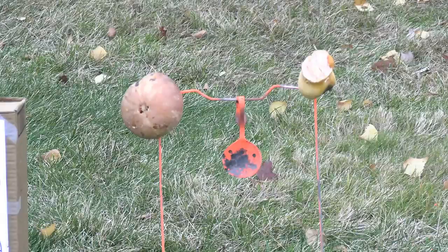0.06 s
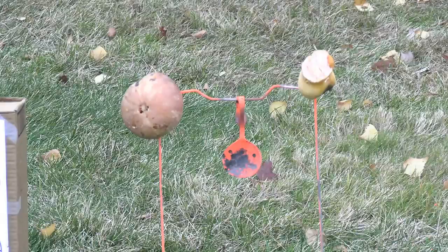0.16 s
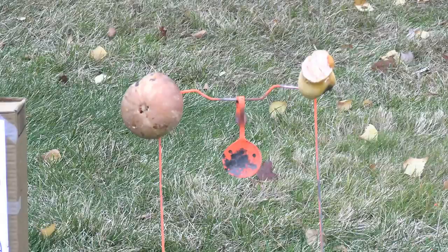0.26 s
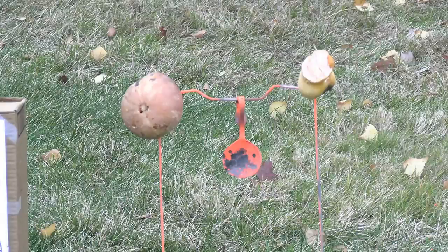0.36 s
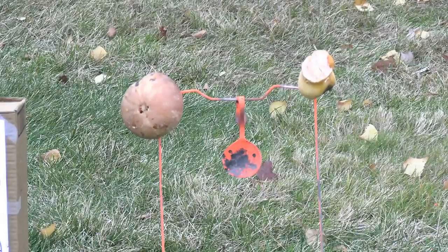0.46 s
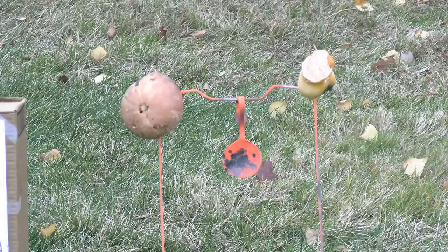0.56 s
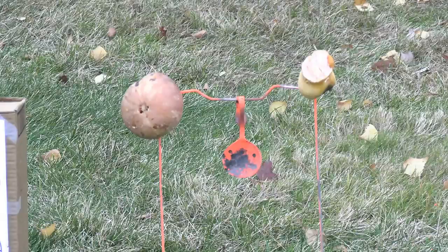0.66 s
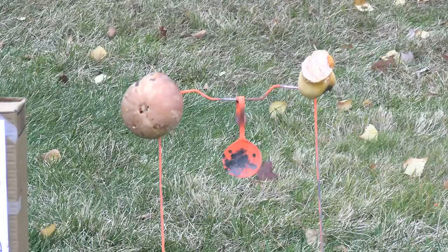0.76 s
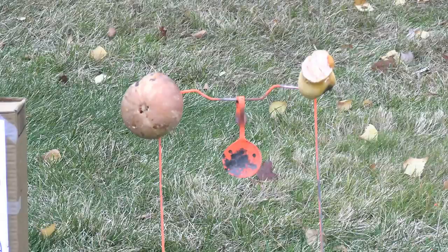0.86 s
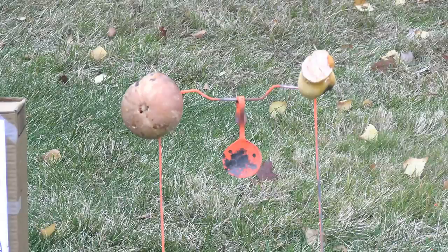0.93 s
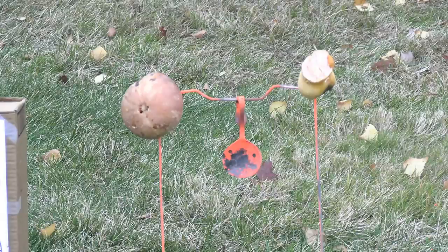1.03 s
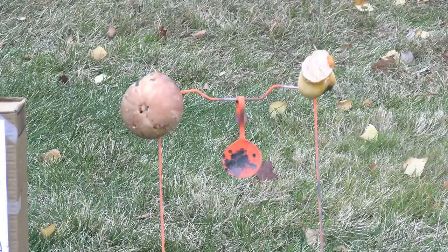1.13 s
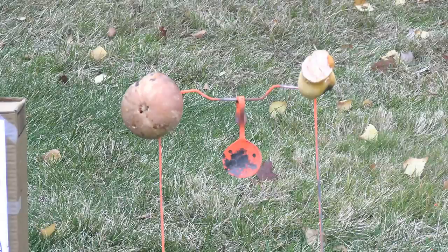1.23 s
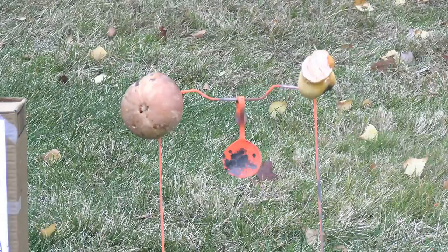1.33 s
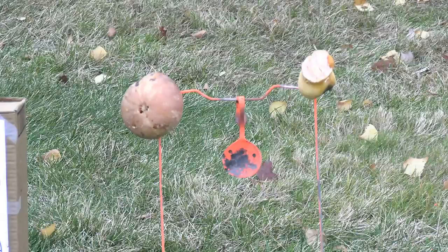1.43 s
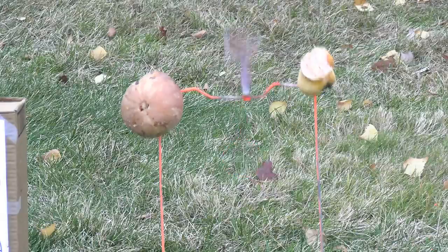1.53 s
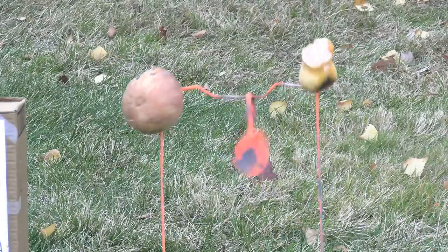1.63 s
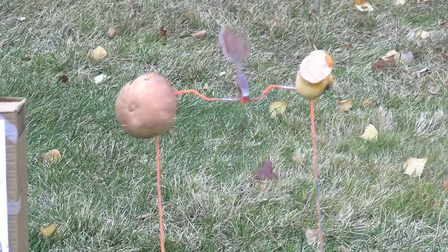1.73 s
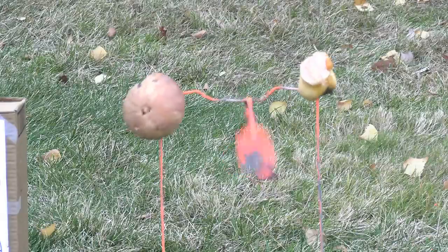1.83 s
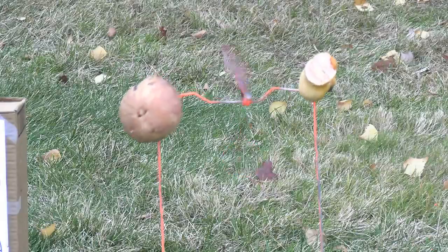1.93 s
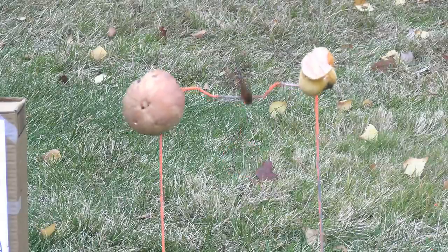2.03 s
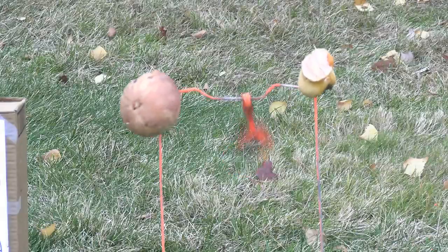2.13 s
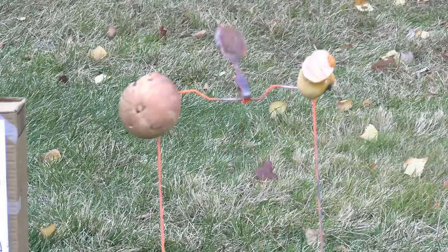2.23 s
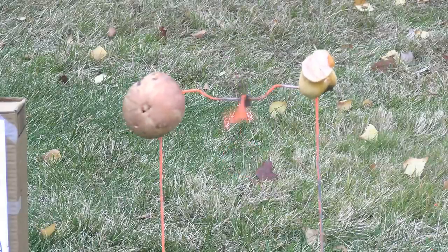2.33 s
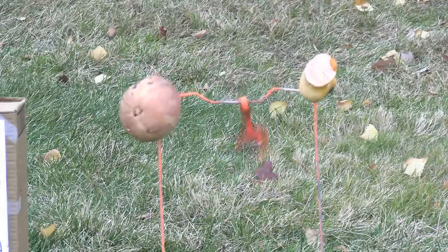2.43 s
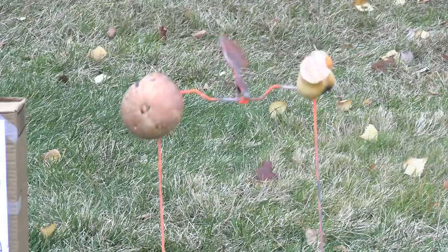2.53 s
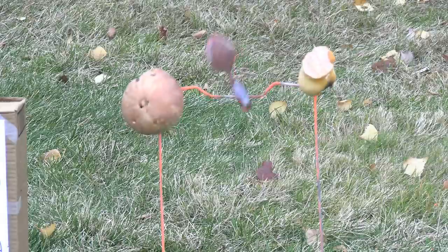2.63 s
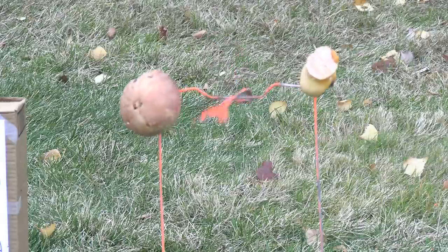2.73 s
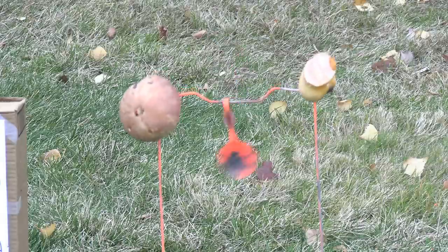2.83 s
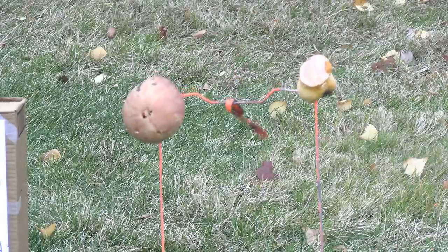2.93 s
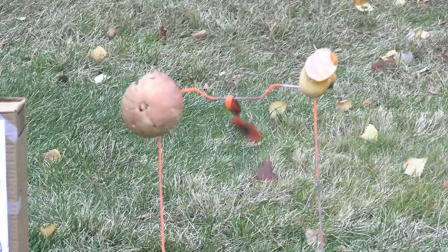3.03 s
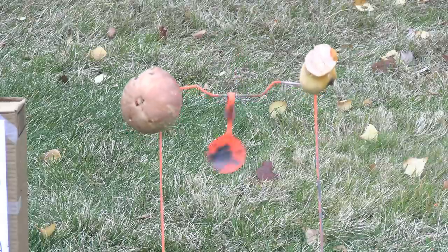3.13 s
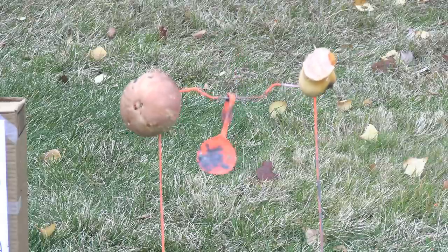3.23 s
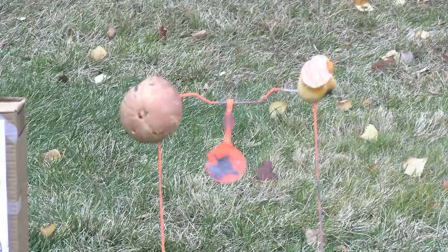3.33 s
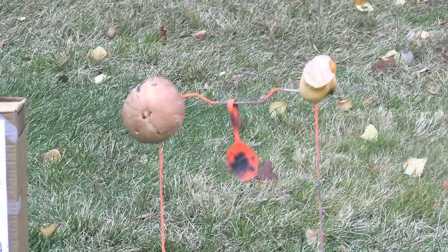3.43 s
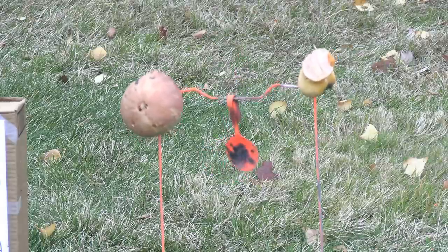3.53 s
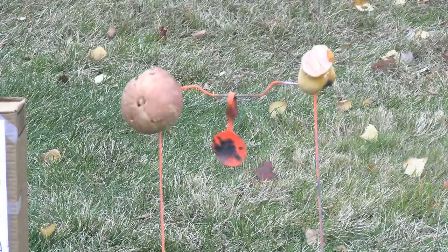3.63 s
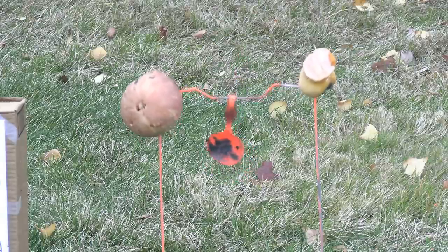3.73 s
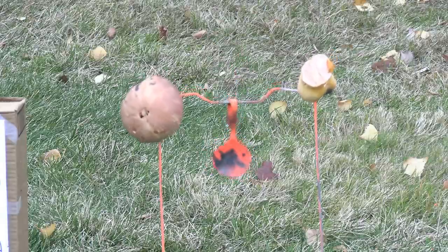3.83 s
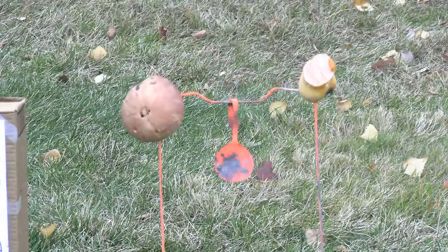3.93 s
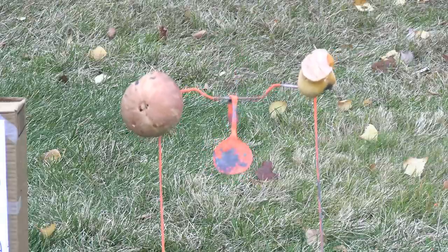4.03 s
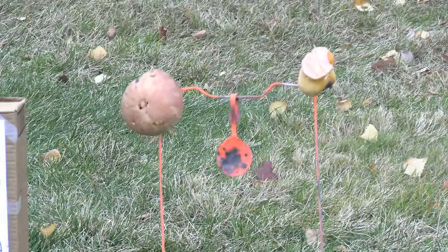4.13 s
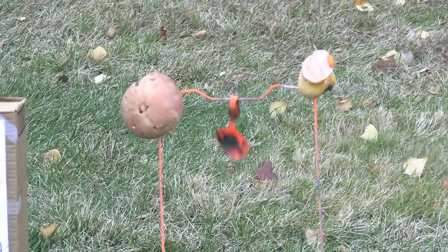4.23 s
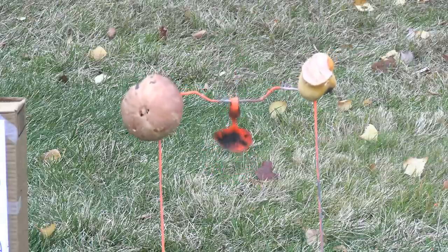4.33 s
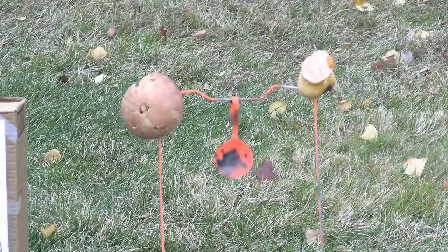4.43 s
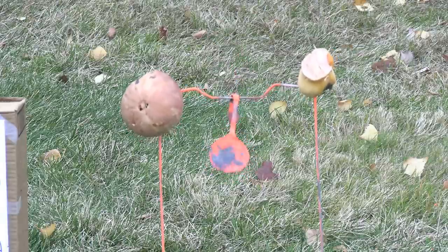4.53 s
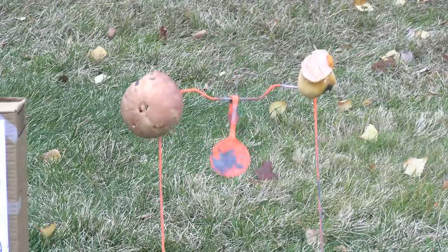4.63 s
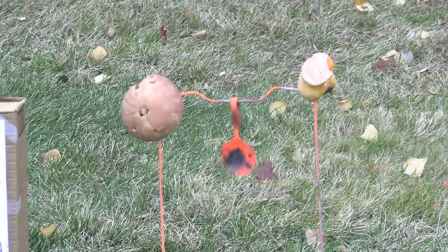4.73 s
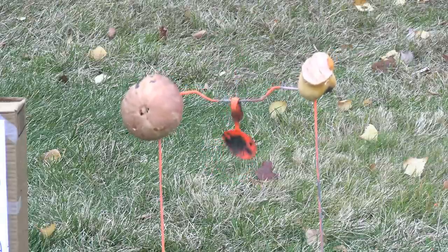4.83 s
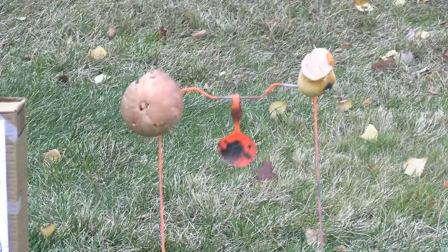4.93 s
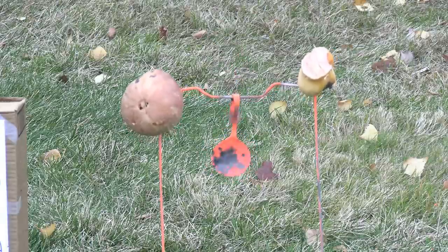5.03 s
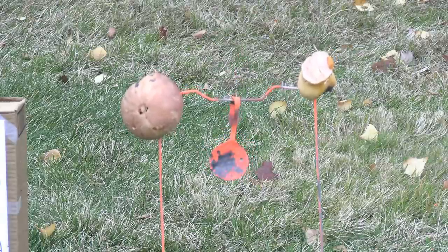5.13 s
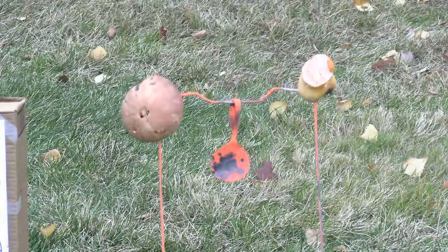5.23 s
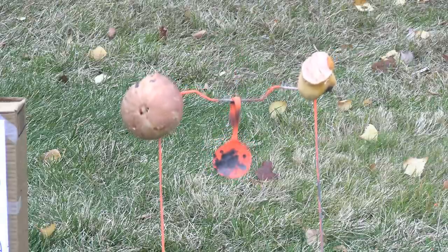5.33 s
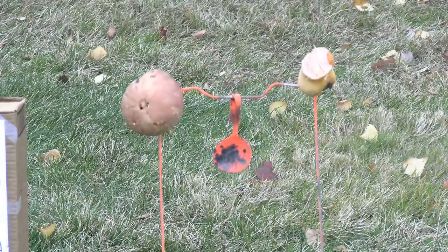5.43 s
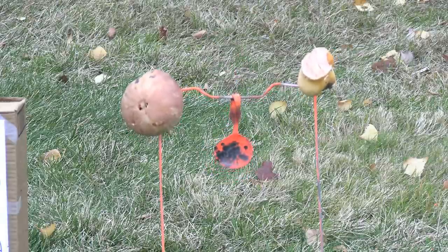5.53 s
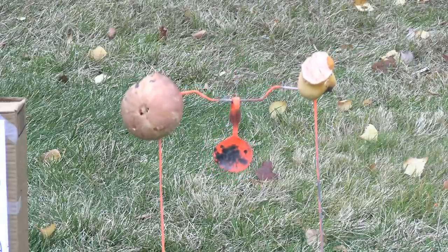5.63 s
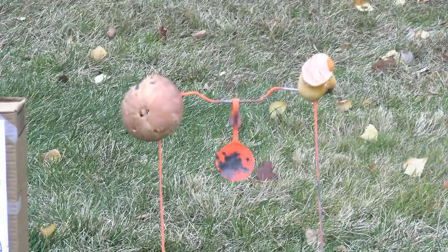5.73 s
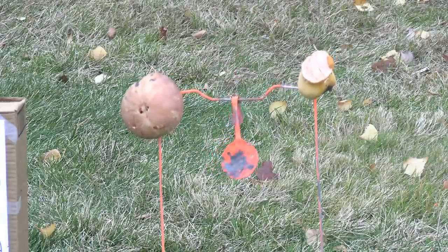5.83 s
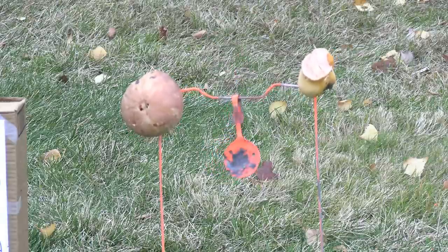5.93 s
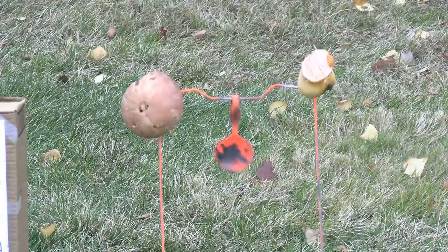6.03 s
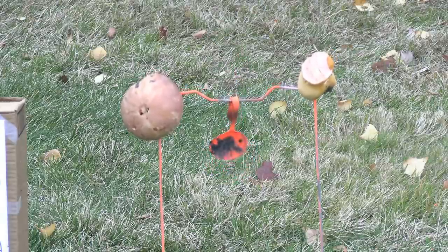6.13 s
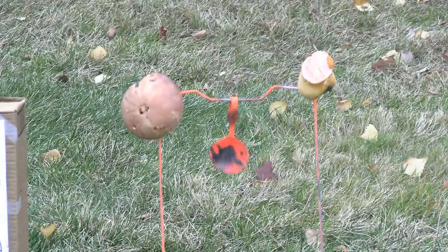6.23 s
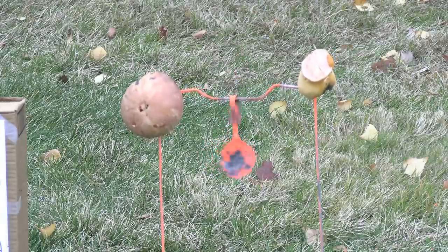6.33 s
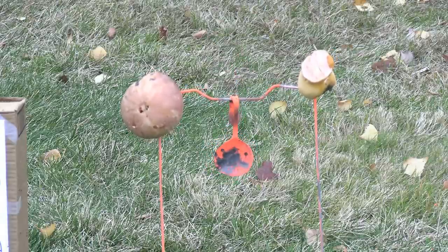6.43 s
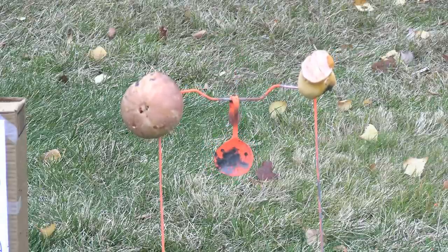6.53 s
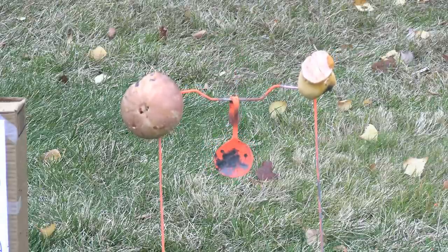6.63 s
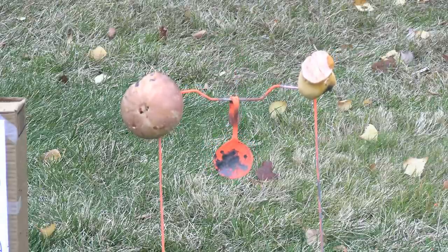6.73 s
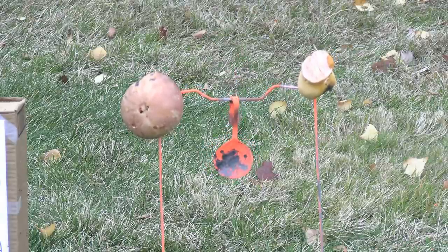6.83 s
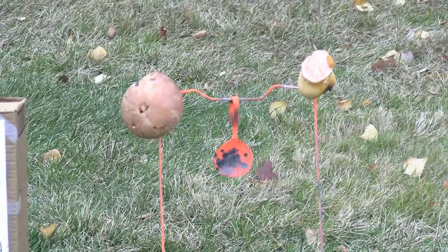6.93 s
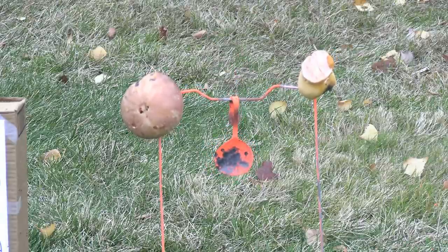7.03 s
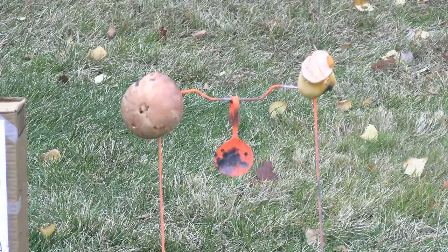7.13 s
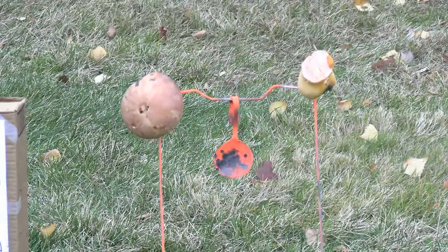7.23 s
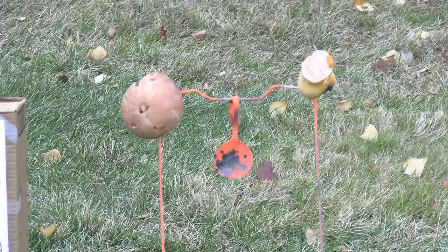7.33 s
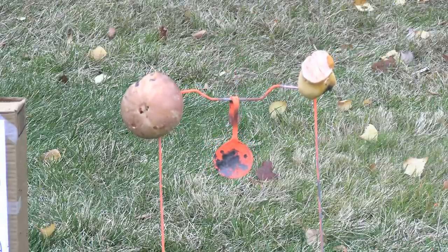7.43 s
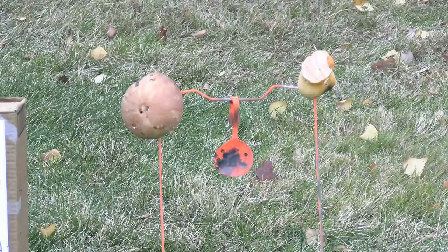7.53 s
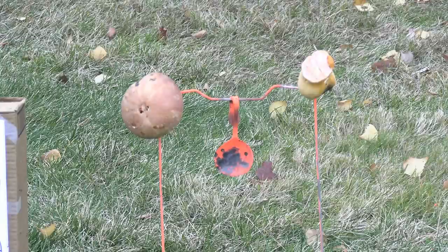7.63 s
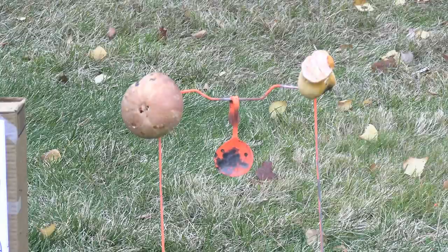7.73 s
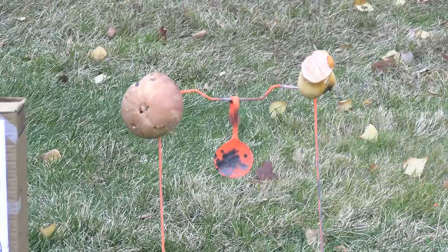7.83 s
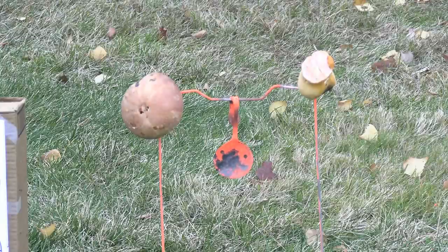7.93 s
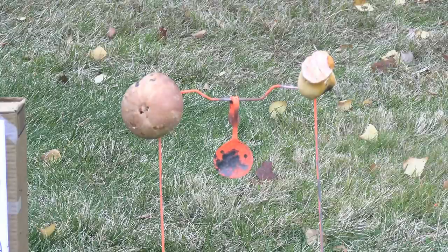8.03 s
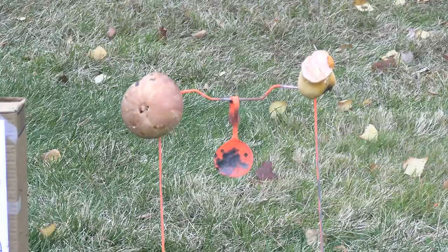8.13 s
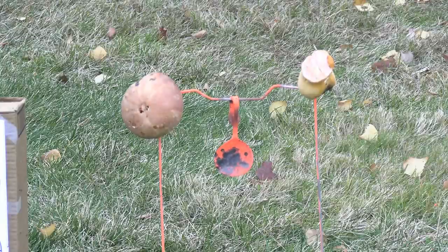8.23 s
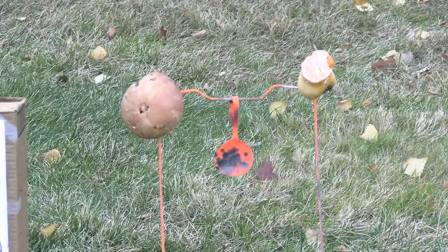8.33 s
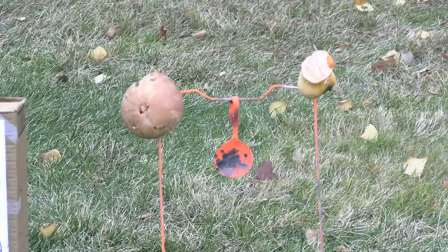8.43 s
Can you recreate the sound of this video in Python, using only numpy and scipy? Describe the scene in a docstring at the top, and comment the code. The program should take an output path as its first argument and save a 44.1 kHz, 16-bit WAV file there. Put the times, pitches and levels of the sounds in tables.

```python
"""Small birds chip while a distant engine hums over faint traffic, made of sine tones and coloured noise.
At 1.5 s an air rifle fires (short pulses) and its pellet slams into a steel paddle (ringing modes and noise).
The hit overloads the microphone and fences throw it back; the paddle spins round its wire axle,
drops onto it with two clanks near 2.8 s and swings to rest with light clinks.
A gull calls far off from 4.2 s, the rifle is handled with dry clicks, and the engine changes gear at 6.4 s."""
import sys
import numpy as np
from scipy import signal
from scipy.fft import rfft
from scipy.io import wavfile
from scipy.ndimage import uniform_filter1d

SR = 44100
rng = np.random.default_rng(int(sys.argv[2]) if len(sys.argv) > 2 else 0)


def wav_out(sig):
    """Save sig, one row per channel (or a flat mono array), as 16-bit PCM at SR to the path in sys.argv[1]."""
    wavfile.write(sys.argv[1], SR, np.round(np.clip(np.atleast_2d(sig).T, -1, 1) * 32767).astype(np.int16))


N = 373527
TIME = np.arange(N) / SR

# ringing modes of the steel paddle: (pitch [Hz], time to fall 60 dB [s], level from the pellet [dB],
# level from a knock on the axle [dB], how strongly the face beams it [0-1])
PADDLE_MODES = [(540, .88, -35, -37, .1), (546.1, .8, -39, -42, .1), (1087, .3, -38, -33, .3),
                (1696, .36, -31, -32, .3), (1955, .47, -17, -16, 1), (2852, .4, -31, -23, .2),
                (4004, .22, -20, -22, .3), (4156, .42, -23, -20, .6), (4722, .2, -28, -29, .2),
                (5403, .18, -16, -10, .2), (5469, .15, -19, -5, .1), (5604, .2, -23, -8.5, .1),
                (6444, .44, -22, -5, .6), (6703, .22, -15, -2.5, .4), (7017, .28, 2.5, 3, 1),
                (6890, .21, -14, -20, .5), (7068, .19, -7, -14, .6), (7553, .18, -17, -24, .2),
                (7725, .16, -20, -16, .1), (7813, .18, -21, -2, .1), (8470, .2, -21, -15, .1),
                (9285, .28, -18, -1, .6), (10302, .3, -18, -12, .8), (10910, .22, -16, -11, .4),
                (9686, .2, -25, -8, .5), (11500, .2, -15, -6, .3), (12282, .19, -30, -17, .1),
                (12932, .2, -24, -22.5, .2), (13690, .15, -23, -15, .2), (14140, .26, -27, -25, .3),
                (15542, .15, -34, -23, .1)]
# the paddle knocking on its axle: (time [s], ring level [dB], click level before trims [dB],
# brightness [dB per octave], ring length [share of the free ring])
AXLE_KNOCKS = [(1.9594, -46.5, -54, -10.5, 0.28), (2.0383, -46, -37, -7.5, 0.67),
               (2.2744, -47.5, -45.5, -9, .42), (2.4325, -55.5, -45.5, -7, 0.49),
               (2.4994, -44, -45, -8.5, .2), (2.6244, -51, -48, 1, .75), (2.7003, -42, -47, -1, 1),
               (2.7445, -20.5, -17, 7, 0.28), (2.7674, -33, -23, 5, 0.34), (2.7911, -37, -24.5, 11, 0.48),
               (2.8094, -35, -34, 0, 0.4), (2.8914, -27, -23, 8, 0.33), (2.8963, -16.5, -16.5, 0.5, 0.79),
               (2.9294, -39, -30.5, -6.5, .43), (2.9854, -47, -29.5, -4, .54),
               (3.2271, -55.5, -51, -7.5, 0.6), (3.5364, -50.5, -55, -2, 0.54),
               (4.2744, -68, -68, -10, .57), (4.8803, -44.5, -44, -2, .45), (6.212, -53, -43, -7, .29)]


def from_db(db):
    """Turn decibels into a gain."""
    return 10 ** (np.asarray(db) / 20)


def die_away(t, t60):
    """An exponential decay that falls by 60 dB in t60 seconds."""
    return np.exp(-np.log(1000) * t / t60)


def rms_one(x):
    """Scale a sound to an rms (average strength) of 1."""
    return x / np.sqrt(np.mean(x ** 2) + 1e-20)


def unit_energy(x):
    """Scale a sound so that its squares add up to 1."""
    return x / np.sqrt(np.sum(x ** 2) + 1e-20)


def curves(rows, t=TIME):
    """Join the rows of a table by straight lines in time, one curve per column."""
    s, *columns = np.transpose(rows)
    return [np.interp(t, s, column) for column in columns]


def fade(start_db, end_db, settle_s):
    """A level in dB that eases from one value towards another."""
    return end_db + (start_db - end_db) * np.exp(-TIME / settle_s)


def add(out, s, sound):
    """Mix a sound in at time s."""
    at = max(round(s * SR), 0)
    out[at:at + len(sound)] += sound[:N - at]


def band(x, low_hz, high_hz):
    """Keep only the pitches between two limits."""
    return signal.sosfilt(signal.butter(2, [low_hz, high_hz], "band", fs=SR, output="sos"), x)


def coloured(spectrum):
    """Steady noise with a given spectrum, rms 1."""
    hz, db = np.transpose(spectrum)
    shape_db = np.interp(np.log(np.fft.rfftfreq(N, 1 / SR) + 1), np.log(hz), db)
    return rms_one(np.fft.irfft(rfft(rng.standard_normal(N)) * from_db(shape_db), N))


def burst(t60, low_hz, high_hz):
    """Half a second of band noise that starts at once and dies away."""
    t = TIME[:SR // 2]
    return rms_one(band(rng.standard_normal(len(t)), low_hz, high_hz)) * die_away(t, t60)


def outdoors():
    """Road rumble, tyres and leaves slowly fade under a passing car and a steady microphone hiss."""
    # relative noise spectra, all: (frequency [Hz], level [dB])
    rumble = [(15, -8.5), (40, -7), (65, -3.5), (100, -4), (170, -0.5), (250, -5.5), (350, -18), (600, -32),
              (2000, -67.5)]
    tyres = [(150, -9), (350, -0.5), (600, -1), (1000, 5), (1400, 2), (1900, -4.5), (2600, -33),
             (5000, -39)]
    leaves = [(800, -11), (2200, 6.5), (3500, -1), (5000, -6.5), (8000, -12), (12000, -24), (16000, -36)]
    car_spectrum = [(150, -19.5), (350, -2.5), (650, 0.5), (1000, -4.5), (1500, -8.5), (3000, -32.5)]
    hiss = [(1000, 0), (5000, 0), (8000, 0), (12000, -2.7), (15600, -3.5), (16200, -24)]
    background = from_db(fade(start_db=-48, end_db=-60, settle_s=11)) * coloured(rumble)
    background += from_db(fade(start_db=-54.5, end_db=-58, settle_s=1.5)) * coloured(tyres)
    background += from_db(fade(start_db=-61.5, end_db=-71.5, settle_s=4.5)) * coloured(leaves)
    # the car's gain falls with the square of its distance; it covers its closest distance in car_width_s
    car_at_s, car_width_s, car_db = 5.1, 0.466, -54
    car_gain = from_db(car_db) / (1 + ((TIME - car_at_s) / car_width_s) ** 2)
    return background + car_gain * coloured(car_spectrum) + from_db(-71) * coloured(hiss)


def engine(waver_hz):
    """An exhaust's low firing tone, its harmonics, and half orders from cylinders of unequal strength."""
    # loudness as the load changes: (time [s], fundamental level [dB], fourth harmonic level [dB])
    load_levels = [(0, -51, -64), (.6, -47, -62.5), (2.4, -54, -68), (3.6, -53, -73.5), (4.3, -46.5, -60.5),
                   (5.1, -46, -60), (5.6, -47, -76), (6.38, -51, -74)]
    # slow unsteadiness of the firing rate: (frequency [Hz], level [dB])
    waver_spectrum = [(2, 0.5), (8, -9), (40, -55.5), (200, -120)]
    shift_at_s, shift_s = 6.38, 0.081
    shifted = np.clip((TIME - shift_at_s) / shift_s, 0, 1)

    def change_gear(before, after):
        """Slide a setting from its value before the gear change to its value after."""
        return before + shifted * (after - before)

    # the rate sags under load, drops at the gear change, then picks up again [Hz, Hz per s]
    hz = change_gear(75.2 - .57 * TIME, 64.4 + 1.7 * (TIME - shift_at_s))
    first_db, fourth_db = curves(load_levels)
    first_db, fourth_db = change_gear(first_db, -60), change_gear(fourth_db, -83)
    second_db = fade(start_db=-45, end_db=-66, settle_s=3.6)  # fades as the engine draws away
    uneven_db = -62.5
    phase = 2 * np.pi * np.cumsum(hz + waver_hz * coloured(waver_spectrum)) / SR
    orders = [(1, first_db), (2, second_db), (4, fourth_db), (1.5, change_gear(uneven_db, -57)), (2.5, uneven_db)]
    # the square root of 2 makes each level an rms level
    return np.sqrt(2) * sum(from_db(db) * np.sin(k * phase) for k, db in orders)


def bird(shape, calls, harmonics=((1, 0),), vary=0.0092, rough=0.0037, flutter_db=2.0):
    """Each call follows the same glide, a little higher or lower, unsteady in pitch and strength."""
    out, t = np.zeros(N), TIME[:round(shape[-1][0] * SR)]
    hz, level_db = curves(shape, t)
    envelope = from_db(level_db) * signal.windows.tukey(len(t), .1)
    for s, db in calls:
        waver = rms_one(uniform_filter1d(rng.standard_normal(SR), size=80))[:len(t)]
        flutter = rms_one(band(rng.standard_normal(SR), low_hz=40.4, high_hz=180))[-len(t):]
        strength = rms_one(from_db(flutter_db * flutter))
        pitch_factor = 1 + vary * rng.standard_normal() + rough * waver
        phase = 2 * np.pi * np.cumsum(hz * pitch_factor) / SR
        voice = sum(from_db(db + part_db) * np.sin(k * phase) for k, part_db in harmonics)
        add(out, s, envelope * strength * voice)
    return out


def gull_far_off():
    """An arched note with harmonics, called in an even series, each call weaker than the last."""
    # the note: (time into the call [s], fundamental pitch [Hz], level [dB])
    gull_shape = [(0, 605.7, -8), (.02, 677, 3.5), (.04, 752.5, 3), (.06, 784, -1.5), (.078, 735, -5),
                  (.092, 619, 1.5), (.11, 600, -7)]
    # the sounding harmonics, without the fundamental: (multiple of the pitch, level [dB])
    gull_harmonics = [(2, -1.5), (3, -17), (4, -20), (5, -20.5), (6, -23.5)]
    start_s, every_s, first_db, loss_db = 4.169, .2465, -46, 2.0
    calls = [(start_s + k * every_s, first_db - k * loss_db) for k in range(6)]
    return bird(gull_shape, calls, gull_harmonics, vary=0.012, rough=0.023, flutter_db=3.5)


def farther_birds():
    """One slurred whistle and two short peeps, each a single gliding tone."""
    # both shapes: (time into the call [s], pitch [Hz], level [dB])
    slur_shape = [(0, 8560, -6), (.02, 7630, 2.5), (.05, 7100, -2), (.075, 7100, -2), (.095, 7500, -8)]
    peep_shape = [(0, 6155, -13), (.015, 6340, -4), (.03, 5900, -2), (.045, 5160, 1.5)]
    # both lists of calls: (time [s], level [dB])
    slurs = [(6.255, -57)]
    peeps = [(7.13, -57.5), (7.972, -57.5)]
    return bird(slur_shape, slurs, rough=0.012) + bird(peep_shape, peeps)


def chipping_bird():
    """A small bird's chip, one tone that falls quickly in pitch."""
    # the chip: (time into the call [s], pitch [Hz], level [dB])
    chip_shape = [(0, 8650, -15), (.004, 8420, 0), (.009, 8050, 1), (.013, 7380, 0), (.019, 5400, -17),
                  (.023, 4750, -10), (.028, 4250, -28), (.032, 3900, -3), (.038, 3600, -15)]
    # its calls: (time [s], level [dB])
    chips = [(.007, -40), (.394, -42), (.812, -42.5), (1.232, -42), (2.052, -39.5), (2.555, -38),
             (3.089, -39.5), (3.575, -40.5), (4.045, -41.5), (4.478, -41), (4.931, -40), (5.469, -39.5),
             (5.909, -40), (6.345, -40.5), (7.787, -52)]
    return bird(chip_shape, chips, vary=.008, rough=.009)


def twigs(per_s, t60):
    """Sparse reflections from near branches, with a weaker, longer tail from far trees; unit energy."""
    t = TIME[:SR // 2]
    fading = die_away(t, t60) + from_db(-14) * die_away(t, 1.2)
    present = rng.random(len(t)) < per_s / SR
    return unit_energy(rng.standard_normal(len(t)) * present * fading)


def yard_response(build_s):
    """Scatter from trees and fences builds up, then each half octave dies at its own pace; unit energy."""
    # diffuse tail of the yard: (frequency [Hz], level [dB], time to fall 60 dB [s])
    yard = [(250, -13, .45), (700, -8, .55), (1600, -6, 0.66), (2600, -2.5, 0.52), (4490, -1.5, 0.72),
            (7000, -3.5, 0.55), (11000, -9, 0.36), (16000, -19, .3)]
    t, out = TIME[:SR], np.zeros(SR)
    hz, db, t60 = np.transpose(yard)
    edges = 125 * 2 ** (np.arange(15) / 2)
    for low, high in zip(edges, edges[1:]):
        middle = np.log(low * high) / 2
        level_db = np.interp(middle, np.log(hz), db)
        decay_s = np.interp(middle, np.log(hz), t60)
        out += band(rng.standard_normal(SR), low, high) * from_db(level_db) * die_away(t, decay_s)
    return unit_energy(out * (1 - np.exp(-t / build_s)))


def fences(x):
    """Hard surfaces return the upper middle of a sound as distinct slaps."""
    # echoes off fences and walls: (delay [s], level [dB])
    echoes = [(.0451, -27), (.1072, -36.5), (.1281, -32), (.1362, -32.5), (.1496, -21.5), (.1866, -27),
              (.3273, -43.5), (.3583, -42)]
    out, slap = np.zeros(N), band(x, low_hz=2450, high_hz=7995)
    for delay, db in echoes:
        add(out, delay, from_db(db) * slap)
    return out


def grate(t60):
    """A spray of tiny contacts of random strength rings the paddle's modes while the axle deadens them."""
    t = TIME[:SR // 10]
    hz, _, _, axle_db, _ = np.transpose(PADDLE_MODES)
    strengths = from_db(axle_db / 2) * (-1) ** np.arange(len(hz))
    deadened = strengths @ np.sin(2 * np.pi * np.outer(hz, t)) * die_away(t, 0.0085)
    contacts = rng.standard_normal(len(t))
    return rms_one(signal.fftconvolve(contacts, deadened)[:len(t)]) * die_away(t, t60)


def clicks():
    """Steel snaps on the axle and the wire frame rattles briefly; the rifle's parts click more dully."""
    # dry clicks from handling the rifle: (time [s], level [dB], time to fall 60 dB [s])
    handling = [(4.5922, -44, 0.023), (5.003, -48, 0.029), (5.02, -47, 0.034), (5.028, -41.5, 0.081),
                (5.162, -56, 0.022), (5.19, -58, .04), (5.209, -57.5, .08)]
    out = np.zeros(N)
    for s, _, db, *_ in AXLE_KNOCKS:
        add(out, s, from_db(db - 6.5) * grate(t60=0.058))
        add(out, s, from_db(db - 1) * burst(t60=0.0061, low_hz=4400, high_hz=11800))
        add(out, s, from_db(db - 21.5) * burst(t60=0.14, low_hz=400, high_hz=4200))
    for s, db, t60 in handling:
        dull = burst(t60, low_hz=2500, high_hz=4420)
        bright = from_db(-5.5) * burst(t60, low_hz=4488, high_hz=9900)
        add(out, s, from_db(db) * (dull + bright))
    return out


def facing():
    """Gain of the plate's beam: two sweeps a turn until wobble spoils the aim, and a return at rest."""
    # hard blows that set the paddle spinning:
    # (time [s], speed [turns per s], turn left until the face points at the listener [share of a turn])
    spins = [(1.5814, 4.05, 0.0074), (2.8963, 2.1, 0.22)]
    edge_on_db, sweep_db, narrowness, wobble_s = -12.5, 3.5, 6, 0.24
    settle_at_s, settle_s = 3.21, 0.37
    sweeps = np.zeros(N)
    for s, turns_per_s, to_go in spins:
        age = np.maximum(TIME - s, 0)
        lobe = np.abs(np.cos(2 * np.pi * (turns_per_s * age - to_go))) ** narrowness
        sweeps += (TIME >= s) * lobe * np.exp(-(age / wobble_s) ** 4)
    # the swing dies and leaves the paddle hanging face-on
    settled = 1 - np.exp(-np.maximum(TIME - settle_at_s, 0) / settle_s)
    return from_db(edge_on_db) + from_db(sweep_db) * sweeps + settled


def paddle(uneven_db, detune):
    """Modes ring from the pellet and from each knock; the plate beams them off its face as it spins."""
    strike_s = 1.5815
    hz, t60, pellet_db, axle_db, beaming = np.transpose(PADDLE_MODES)
    s, knock_db, _, brightness, freedom = np.transpose(AXLE_KNOCKS)
    luck = rng.standard_normal((len(s), len(hz)))
    pull = rng.standard_normal((len(s), len(hz)))
    aim, t = facing(), TIME[:SR]
    struck, knocked = np.zeros(N), np.zeros(N)
    for k in range(len(hz)):
        octaves = np.log2(hz[k] / np.median(hz))
        levels = knock_db + axle_db[k] + brightness * octaves + uneven_db * luck[:, k]
        # a paddle pressed on the axle rings for a shorter time, and the modes of its stem go off pitch
        pitches = hz[k] * (1 + detune * pull[:, k] * (1 - freedom) * (1 - beaming[k]))
        blows = [(struck, strike_s, pellet_db[k], 1, hz[k])]
        blows += [(knocked, *knock) for knock in zip(s, levels, freedom, pitches)]
        beam = aim ** beaming[k]
        for out, when, db, share, pitch in blows:
            at = round(when * SR)
            tone = (-1) ** k * np.sin(2 * np.pi * pitch * t) * die_away(t, t60[k] * share)
            add(out, when, from_db(db) * tone * beam[at:at + SR])
    return struck, knocked


def rushes():
    """Air, shattering lead and the shaken frame: noise that swells to a peak and dies."""
    # in order: spring thud, muzzle air, pellet whizz, crack, lead spray, frame shudder, thump of the stakes,
    # skid on the axle: (peak time [s], level [dB], rise [s], time to fall 60 dB [s], low [Hz], high [Hz])
    noise_rushes = [(1.511, -27.5, .001, .11, 30, 410), (1.529, -33.5, 0.01, 0.26, 1400, 8542),
                    (1.58, -26.5, .011, 0.015, 2000, 8500), (1.582, 12, 0.00016, .016, 1800, 14000),
                    (1.596, -6, 0.0046, .095, 3600, 14000), (1.584, -17.5, .001, 0.11, 300, 2600),
                    (1.583, -21, .001, 0.0803, 35, 1300), (1.701, -23.5, .002, 0.076, 9000, 11600)]
    lead_in_s = 1 / 10
    out, t = np.zeros(N), TIME[:SR] - lead_in_s
    for s, db, rise, t60, low_hz, high_hz in noise_rushes:
        envelope = np.exp(np.minimum(t, 0) / rise) * die_away(np.maximum(t, 0), t60)
        noise = rms_one(band(rng.standard_normal(SR), low_hz, high_hz))
        add(out, s - lead_in_s, from_db(db) * envelope * noise)
    return out


def rifle():
    """Piston and muzzle give a few sharp pulses, each ringing for a cycle or two."""
    # pressure pulses before the band filter: (time [s], level [dB], pitch [Hz])
    shot = [(1.5033, -28.5, 2597), (1.5055, -23, 6500), (1.5077, -10, 3200), (1.5094, 2, 6800),
            (1.51, 3.5, 6000), (1.516, -2, 2997), (1.5175, -12.5, 2298)]
    out, t = np.zeros(N), TIME[:SR // 50]
    for s, db, hz in shot:
        add(out, s, from_db(db) * np.sin(2 * np.pi * hz * t) * np.exp(-.8 * hz * t))
    return band(out, 300, 13000)


def scene():
    """Shot, target and birds with their share of the yard's reverberation, over the background."""
    struck, knocked = paddle(uneven_db=2.0, detune=.007)
    bang, clinks = rifle() + rushes(), knocked + clicks()
    near_bird, far_birds, gull = chipping_bird(), farther_birds(), gull_far_off()
    scattered = from_db(-27.5) * bang + from_db(-35) * struck + from_db(-30) * clinks
    among_trees = from_db(-8.5) * near_bird + from_db(0.5) * far_birds + from_db(-6) * gull
    tail = signal.fftconvolve(scattered, yard_response(build_s=.06))[:N]
    tail += signal.fftconvolve(among_trees, twigs(per_s=1500, t60=.22))[:N]
    direct = bang + struck + clinks + near_bird + far_birds + gull
    slaps = fences(bang + from_db(-12) * struck)
    return (direct + slaps + tail + engine(waver_hz=.45) + outdoors())[None]


def record(dry):
    """Overload flattens the loudest peaks, then a steep filter removes the top above 16200 Hz."""
    overloaded = np.clip(dry, -1, 1)
    return signal.sosfilt(signal.ellip(10, .1, 70, 16200, fs=SR, output="sos"), overloaded)


dry = scene()
out = record(dry)
wav_out(out)
```